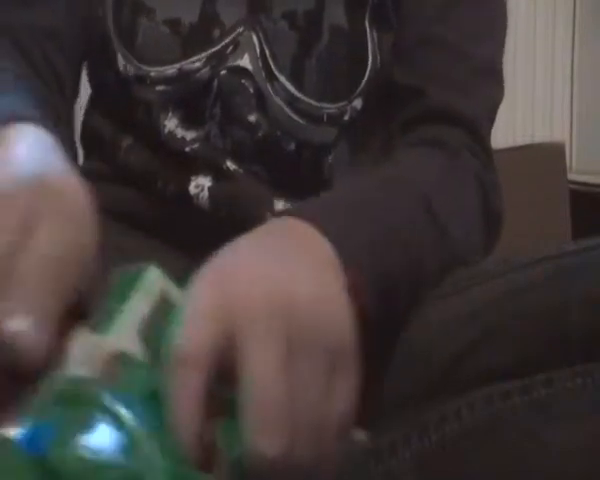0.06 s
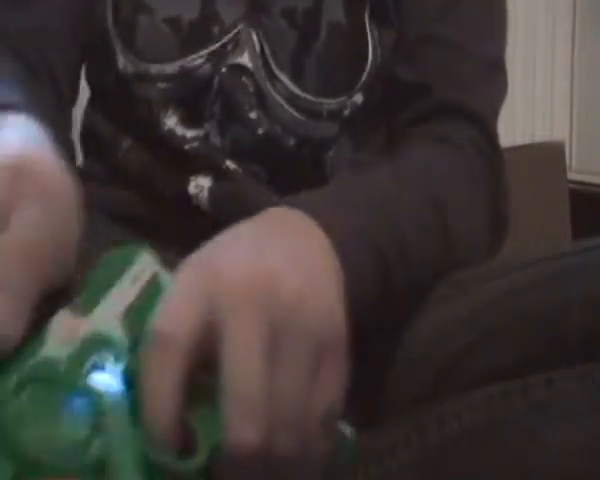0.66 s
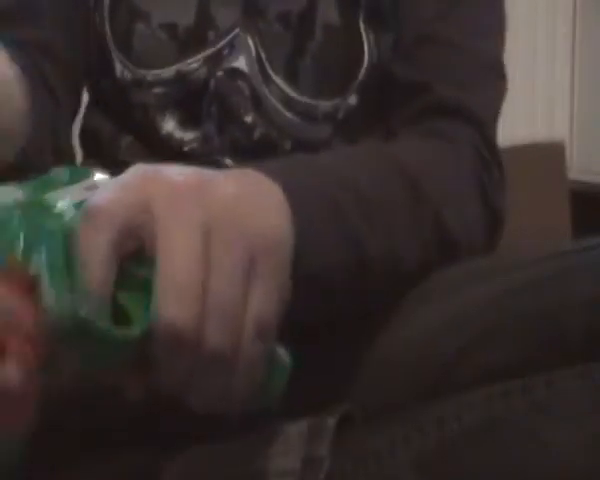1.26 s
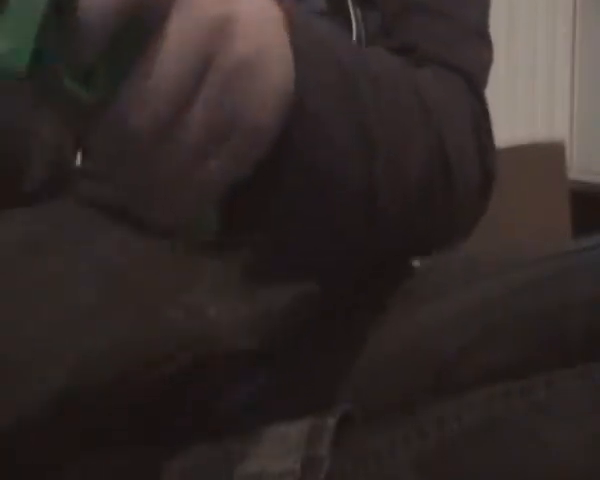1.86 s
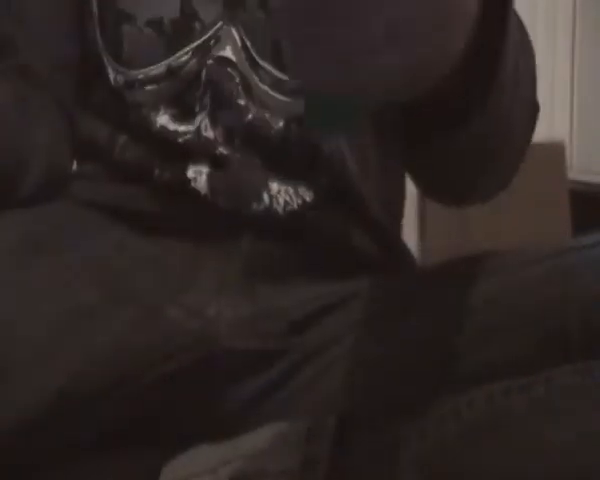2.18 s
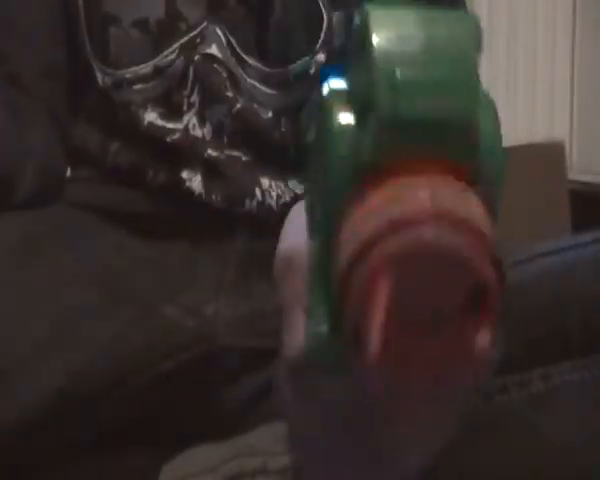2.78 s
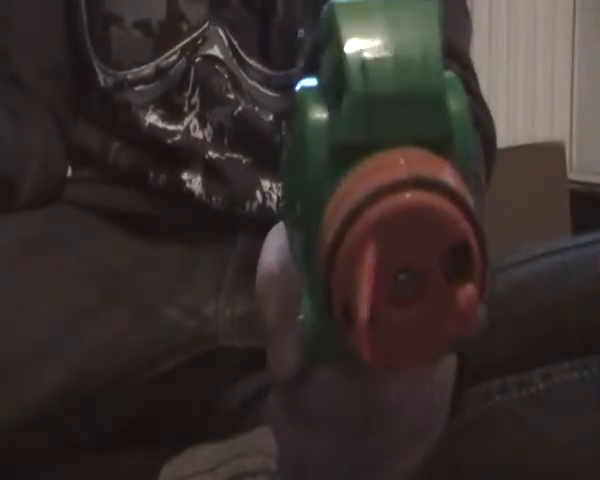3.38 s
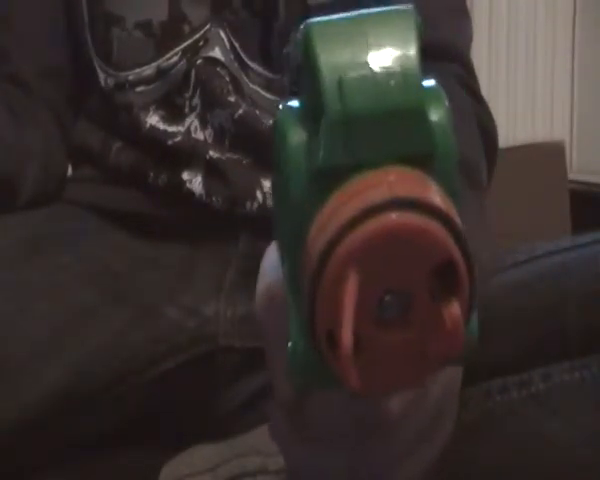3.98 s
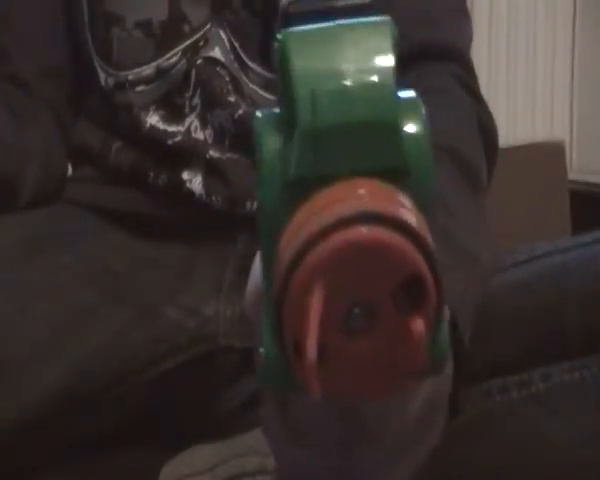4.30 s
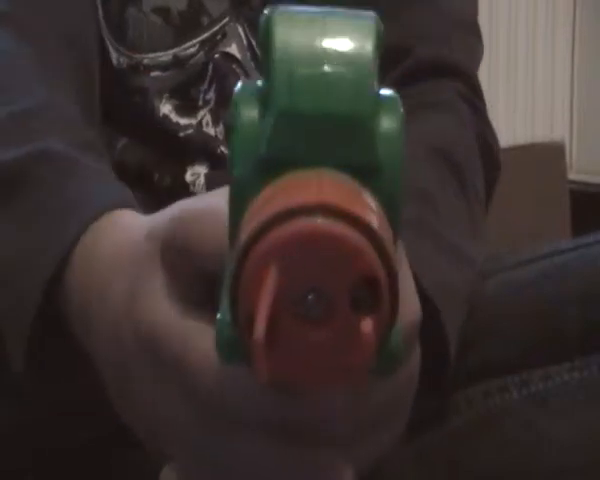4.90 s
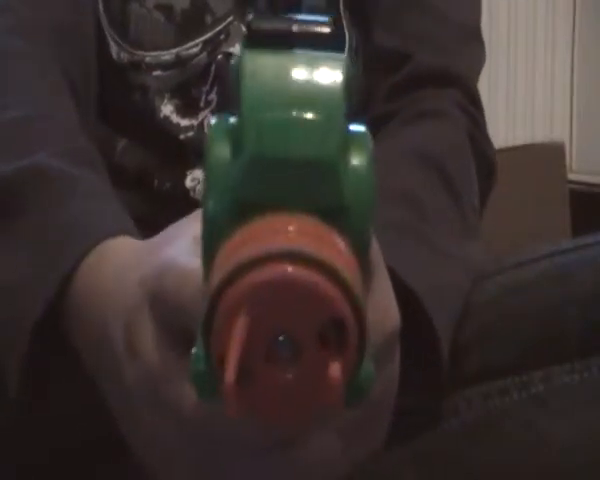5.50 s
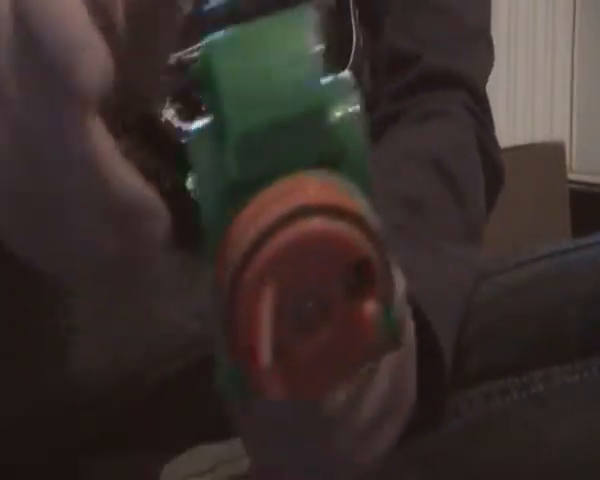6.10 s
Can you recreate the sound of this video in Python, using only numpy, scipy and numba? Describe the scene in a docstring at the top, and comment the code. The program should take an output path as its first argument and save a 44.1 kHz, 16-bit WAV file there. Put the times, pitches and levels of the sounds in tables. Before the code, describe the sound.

Quick runs of loud plastic clicks and rattles from a toy gun's slide, followed by quiet taps and creaks, close up in a small room.

```python
"""Pumping a plastic toy launcher

The toy is pumped three times in a small room, close to a camera, then turned over and gripped. Its slide
scrapes and rattles, a pawl snaps over a ratchet and the slide hits its stop; all excite the modes of the
hollow shell. Later come soft knocks, stick-slip creaks of the seams and the whir of the lens motor as it
refocuses. Cloth rustles over a faint hiss, and a limiter holds the peaks."""
import sys
import numpy as np
from scipy import signal
from scipy.fft import rfft, irfft, next_fast_len
from scipy.io import wavfile
from scipy.ndimage import uniform_filter1d
from numba import njit

SR = 44100
rng = np.random.default_rng(int(sys.argv[2]) if len(sys.argv) > 2 else 0)


def transcribe(signal):
    """Save signal, clipped to [-1, 1], as a 16-bit WAV file at the path in sys.argv[1]."""
    frames = np.atleast_2d(signal).T
    limited = np.clip(frames, -1, 1)
    pcm = np.round(limited * 32767).astype(np.int16)
    wavfile.write(sys.argv[1], SR, pcm)


N = 275625
CLICK_SIZE = 4096  # samples in one impact

# Travels of the slide, plastic on plastic. Each row: start and end in seconds, first and last
# relative level in dB, extra bass of its jiggling in dB.
SLIDE_TRAVELS = [(0.023, 0.095, -21.5, -27, -8), (0.26, 0.296, -29.5, -23, -6),
                 (0.321, 0.404, -25.5, -21.5, 6), (0.639, 0.721, -23.5, -27, -7),
                 (0.862, 0.902, -31.5, -23, -14), (0.943, 1.05, -24, -27, 6.5),
                 (1.247, 1.329, -31, -34, -17), (1.505, 1.541, -27.5, -30, -12.5),
                 (1.562, 1.683, -29.5, -23, 5), (2.204, 2.258, -39, -35, -6),
                 (2.256, 2.37, -27, -47.5, -12), (2.508, 2.541, -47, -40, -3), (4.79, 5.07, -61, -56, 4),
                 (6.055, 6.24, -47.5, -65, 6)]


def end_stop():
    """Impact: the slide is halted at the end of its travel. Returns the clacks and the low jolts."""
    # Each row: start in seconds, relative level in dB, chatter in seconds, extra bass and treble in dB,
    # panel pitch in Hz.
    hits = [(0.0796, -9.5, 0.0024, 3, -4, 2820), (0.3881, -10, 0.0042, -11, 0, 2780),
            (0.705, -9, 0.0022, 2, -4, 3450), (1.0297, -10, 0.0026, 0, 0.5, 2630),
            (1.0335, -11.5, 0.0027, -3.5, 2.5, 3140), (1.33, -10.5, 0.0029, -0.5, -4, 2780),
            (1.6465, -10, 0.0035, -1, 3, 2580)]
    # Spectrum of the contact. Each row: frequency in Hz, gain in dB.
    colour = [(80, -18), (200, -20), (400, -14), (900, -14.5), (1500, -8.5), (2000, -5), (2700, -0.5),
              (3600, -2.5), (4800, -3.5), (6000, -10), (7600, -11.5), (9800, -8.5), (11800, -13),
              (13000, -32)]
    clacks = impacts(hits, colour, gain_db=1.5, ring_db=-18, buzz_db=-17, buzz_s=.006)
    return clacks, thuds(hits, gain_db=-39.5)


def ratchet(treble_db=-.1):
    """Elastic release: a pawl snaps over a few teeth on each pull. Returns the snaps and the low jolts."""
    # Each row: start in seconds, relative level in dB, chatter in seconds, extra bass in dB,
    # panel pitch in Hz.
    teeth = [(0.3483, -17.5, 0.0015, -4, 3620), (0.3511, -8, .0036, -1, 2610),
             (0.3664, -18.5, .002, 2, 4950), (0.3802, -19, .003, -2.5, 2560),
             (0.9705, -14, .0035, -0.5, 2650), (0.9917, -14, .003, -4.5, 2630),
             (1.0117, -13.5, .0025, -4.5, 2500), (1.6031, -13.5, 0.0041, 3, 4970),
             (1.619, -21.5, .0048, -2, 4570), (1.6317, -12, 0.0021, -4, 3140)]
    # Spectrum of a snap. Each row: frequency in Hz, gain in dB.
    colour = [(80, -30.5), (200, -13), (400, -7.5), (900, -15), (1500, -3.5), (2000, -4.5), (2700, -0.5),
              (3600, -2), (4800, 0), (6000, -6.5), (7600, -7), (9800, 4.5), (11800, -4), (13000, -19.5)]
    hits = [(s, db, chatter_s, bass_db, treble_db, hz) for s, db, chatter_s, bass_db, hz in teeth]
    snaps = impacts(hits, colour, gain_db=3, ring_db=-15, buzz_db=-18.5, buzz_s=.005)
    return snaps, thuds(hits, gain_db=-46.5)


def slide_rattle():
    """Backlash: parts with free play collide, as the slide clacks in its guides, jiggles and settles."""
    # Each row: start in seconds, relative level in dB, chatter in seconds, extra bass and treble in dB,
    # panel pitch in Hz.
    clacks = [(0.0421, -15, 0.0043, -10, 6, 4930), (0.052, -18, 0.0059, -11.5, -4.5, 4200),
              (0.2638, -24.5, .0048, -3, -6, 4034), (0.275, -18, .0018, -13, -15, 3510),
              (0.2847, -14.5, 0.0033, 0, -1, 3960), (0.6491, -22.5, .002, -5.5, -0.5, 4350),
              (0.6686, -16.5, .001, -11.5, 6.5, 5100), (0.679, -20, .0044, -8.5, 1, 4804),
              (0.84, -33.5, 0.0016, 1.5, -14, 2990), (0.8931, -18.5, 0.004, 3, -4, 4610),
              (0.935, -29.5, 0.0031, 4.5, -9.5, 2820), (1.2172, -38, 0.0013, 11.5, -3, 2862),
              (1.2518, -27, .0018, -14, -5, 2820), (1.271, -16, .0017, -24, 6.5, 5230),
              (1.2598, -26, .0022, -17, 1, 4393), (1.2895, -22, 0.0055, -9, 2, 5170),
              (1.5081, -24, .004, -16, -0.5, 2780), (1.5334, -17.5, 0.0014, 0.5, 2.5, 4950),
              (1.5814, -25, .0025, 9.5, -8.5, 4650), (1.8634, -39.5, 0.0015, 2.5, -16, 2990),
              (2.2535, -21, .001, -1.5, 5, 4830), (2.2765, -20, .007, -15, 6, 4755),
              (2.3123, -25, .0013, -14, -3, 3600)]
    # Spectrum of a clack. Each row: frequency in Hz, gain in dB.
    colour = [(80, -24), (200, -17), (400, -10), (900, -14.5), (1500, -8.5), (2000, -5), (2700, -0.5),
              (3600, -1.5), (4800, 0), (6000, -3.5), (7600, -6), (9800, -5), (11800, -10.5), (13000, -29.5)]
    hits = clacks + settling_hits() + jiggling_hits()
    return impacts(hits, colour, gain_db=-.5, ring_db=-11, buzz_db=-13, buzz_s=.011)


def jiggling_hits(gap_s=.011, chatter_s=.002, offset_db=-4.5, scatter_db=2):
    """Intermittent contact: the moving slide taps its guides unevenly, the harder the more it scrapes."""
    hits = []
    for start, end, first_db, last_db, bass_db in SLIDE_TRAVELS:
        treble_db = -6 - .45 * bass_db  # the thinner a tap, the brighter
        hz = 4750 * 2 ** (.03 * treble_db)  # a brighter tap comes from a stiffer panel
        for s in np.arange(start + gap_s / 2, end - gap_s, gap_s):
            late, strength = rng.random(2)
            scrape_db = np.interp(s, [start, end], [first_db, last_db])
            db = scrape_db + offset_db + scatter_db * (2 * strength - 1)
            hits.append((s + late * gap_s, db, chatter_s, bass_db, treble_db, hz))
    return hits


def settling_hits(gap_s=.0275, fall_db_per_s=110, chatter_s=.002, bass_db=-1.5, treble_db=-6):
    """Dissipation: loose parts tick on after a stroke with exponentially falling strength."""
    # Each row: start and end in seconds, relative level of the first tick in dB, panel pitch in Hz.
    runs = [(0.124, 0.135, -28.5, 3430), (0.731, 0.8, -25.5, 2680), (1.7237, 1.76, -31, 3000),
            (2.333, 2.48, -35, 4500)]
    hits = []
    for start, end, first_db, hz in runs:
        for age in np.arange(0, end - start, gap_s):
            late, strength = rng.standard_normal(2)
            db = first_db - fall_db_per_s * age + 1.5 * strength
            hits.append((start + age * (1 + .045 * late), db, chatter_s, bass_db, treble_db, hz))
    return hits


def slide_scrape(gain_db=-2, ring_db=-9, slips_per_s=420, spread_db=3.5, slip_s=.001, rub=.3):
    """Stick-slip friction: the slide drives the shell with random micro-impacts over a faint rub."""
    # Spectrum of the friction. Each row: frequency in Hz, gain in dB.
    colour = [(100, -30), (400, -14), (1100, -19.5), (1700, -10), (2500, 3), (4600, 4), (6200, -5),
              (9500, -7), (11800, -14), (13000, -25.5)]
    out, size = np.zeros((2, N)), 4 * CLICK_SIZE
    for start, end, first_db, last_db, _ in SLIDE_TRAVELS:
        span = int(np.clip((end - start) * SR, 100, size - CLICK_SIZE))
        slips = rng.random(size) < slips_per_s / SR
        strengths = undb(spread_db * np.minimum(rng.exponential(size=size), 2))
        friction = signal.lfilter([1], [1, -np.exp(-1 / (slip_s * SR))], slips * strengths) + rub
        force = (friction * rng.standard_normal((2, size)))[:, :span]
        force *= undb(np.linspace(0, last_db - first_db, span)) / rms(force)
        force *= signal.windows.tukey(span, .22)  # the slide gathers speed and slows again
        ring = 1 + undb(ring_db) * rfft(irfft(shell_ring()), size)
        body = minimum_phase(over_hz(colour, size)) * ring
        scrape = irfft(microphone_ports(rfft(force, size) * body / rms(abs(body))))
        add(out, start, undb(first_db + gain_db) * scrape)
    return out


def handling_knocks(rebound_s=.0105, loss_db=3):
    """Inelastic collision: hands and parts knock on the shell; each rebound is softer and duller."""
    # Each row: start in seconds, relative level in dB, chatter in seconds, extra bass and treble in dB,
    # panel pitch in Hz, number of rebounds.
    knocks = [(1.9712, -32, 0.0071, -6.5, -9.5, 2300, 0), (2.2085, -28, .008, -6, -0.5, 3020, 1),
              (2.4964, -42.5, 0.004, 2, -22, 2440, 0), (2.5114, -27.5, 0.0026, -5.5, 0.5, 2600, 2),
              (2.703, -48, 0.0025, -10, 5, 3100, 0), (2.732, -28.5, 0.0024, -6, -2, 2920, 0),
              (2.9415, -52, .006, -6, -9, 3010, 0), (2.9787, -48.5, .0024, -8, -1, 4260, 0),
              (3.2634, -51, 0.0018, 2.5, -14, 2220, 0), (3.607, -36.5, 0.0039, -12.5, -8, 2674, 0),
              (3.963, -39, 0.0036, -5.5, -1, 2740, 0), (4.8525, -37.5, .004, -12, -2, 3150, 0),
              (4.8574, -30.5, 0.0033, -11, 1.5, 3470, 0), (4.9406, -33, 0.0054, -5, 9, 2220, 0),
              (5.021, -45.5, 0.0055, 2.5, 5, 2500, 0), (6.0736, -40.5, .0045, 0, -4, 2250, 1),
              (6.1209, -39.5, .004, -2.5, 6, 2220, 0), (6.131, -34.5, 0.0033, -7.5, -4, 2500, 0),
              (6.1686, -38.5, .0025, -9.5, -9, 2470, 0), (6.217, -45, .002, -9, 0, 2620, 0)]
    # Spectrum of a knock. Each row: frequency in Hz, gain in dB.
    colour = [(80, -20.5), (200, -9), (400, 1.5), (900, -3), (1500, -5), (2000, -3), (2700, -2.5),
              (3600, -5), (4800, -7.5), (6000, -12.5), (7600, -17), (9800, -17.5), (11800, -21),
              (13000, -41)]
    hits = [(s + k * rebound_s, db - k * loss_db, chatter_s, bass_db, treble_db - k * loss_db, hz)
            for s, db, chatter_s, bass_db, treble_db, hz, rebounds in knocks
            for k in range(rebounds + 1)]
    return impacts(hits, colour, gain_db=.56, ring_db=-12, buzz_db=-4.5, buzz_s=.0076)


def seam_creaks(chatter_s=.0026, pitch_scatter=.12):
    """Stick-slip motion: seams yield in runs of dry clicks, faster or slower as the grip changes."""
    # Each row: first and last slip in seconds, number of slips, ratio of each gap to the one before,
    # first and last relative level in dB, tilt from bass to treble in dB, panel pitch in Hz.
    runs = [(3.7005, 3.7435, 4, 1.2, -56.5, -56, 2, 3450), (3.8035, 3.9387, 8, 0.87, -54.5, -50.5, 1, 3730),
            (4.024, 4.0615, 2, 1, -54, -50.5, 1.5, 3810), (4.4465, 4.4837, 2, 1, -55.5, -57, -2, 2400),
            (4.509, 4.6415, 6, 1.17, -49, -48.5, -3, 3040), (4.7143, 4.7143, 1, 1, -49.5, -49.5, -8, 2330),
            (5.1097, 5.1656, 4, .85, -49.5, -48.5, -6.5, 2970), (5.649, 5.649, 1, 1, -36, -36, 8.5, 5300),
            (5.7734, 5.8883, 2, 1, -52.5, -58.5, -5, 2340)]
    # Spectrum of a slip. Each row: frequency in Hz, gain in dB.
    colour = [(80, -27), (200, -24), (400, -5.5), (900, -5.5), (1500, -11), (2000, 3.5), (2700, -2),
              (3600, 3), (4800, -0.5), (6000, -7), (7600, -8), (9800, -2.5), (11800, -4), (13000, -39)]
    hits = []
    for start, end, slips, gap_ratio, first_db, last_db, tilt_db, hz in runs:
        steps = np.cumsum(float(gap_ratio) ** np.arange(slips))
        times = np.interp(steps, steps[[0, -1]], [start, end])
        levels = np.linspace(first_db, last_db, slips)
        pitches = hz * np.exp(pitch_scatter * rng.standard_normal(slips))
        hits += [(s, db, chatter_s, -tilt_db, tilt_db, pitch)
                 for s, db, pitch in zip(times, levels, pitches)]
    return impacts(hits, colour, gain_db=1, ring_db=-14, buzz_db=-16, buzz_s=.004)


def impacts(hits, colour, gain_db, ring_db, buzz_db, buzz_s, panel_width_hz=260, attack_s=.00093):
    """Source and filter: parts chatter and loose seams buzz, exciting the struck panel and the shell."""
    out, t = np.zeros((2, N)), np.arange(CLICK_SIZE) / SR
    bins_hz = np.fft.rfftfreq(CLICK_SIZE, 1 / SR)
    bass_shelf = over_hz([(1000, 1), (2000, 0)], CLICK_SIZE)
    treble_shelf = over_hz([(4500, .0044), (8500, 1)], CLICK_SIZE)
    attack, fade = 1 - np.exp(-t / attack_s), np.linspace(1, 0, CLICK_SIZE)
    for s, db, chatter_s, bass_db, treble_db, panel_hz in hits:
        contact = np.exp(-(t / chatter_s) ** 2) + undb(buzz_db) * np.exp(-t / buzz_s)
        force = rfft(rng.standard_normal((2, CLICK_SIZE)) * contact * attack)
        force /= np.sqrt(uniform_filter1d(abs(force) ** 2, size=90))  # hard contact feeds all bands
        shelves_db = bass_db * bass_shelf + treble_db * treble_shelf
        panel_db = 6 / (1 + ((bins_hz - panel_hz) / panel_width_hz) ** 2)
        body = minimum_phase(over_hz(colour, CLICK_SIZE) + shelves_db + panel_db)
        body *= 1 + undb(ring_db) * shell_ring()
        click = irfft(microphone_ports(force * body)) * fade
        onset_energy = np.mean(np.sum(click[:, :330] ** 2, axis=1))
        onset_rms = np.sqrt(onset_energy / (.005 * SR))  # that energy spread over 5 ms
        add(out, s, undb(db + gain_db) * click / onset_rms)
    return out


def shell_ring(scatter_db=3, detune=.008):
    """Modal superposition: the spectrum of the shell's damped modes, weighted anew at each contact."""
    # Each row: frequency in Hz, relative level in dB, time to decay by 60 dB in seconds.
    modes = [(312, -13, .07), (530, -13, .05), (1040, -10.5, .04), (1400, -12.5, .04), (1897, -1.5, .05),
             (2310, -2.5, 0.15), (2480, -2.5, 0.13), (2758, -2, 0.023), (3097, -5, 0.054),
             (3530, -4.5, 0.062), (4077, -3, .04), (4714, -7.5, .04), (4880, -2.5, .04), (5114, -6.5, .035)]
    hz, db, t60 = np.transpose(modes)[:, :, None]
    weight, shift, phase = rng.standard_normal((3, len(modes), 1))
    t = np.arange(CLICK_SIZE) / SR
    envelopes = undb(db + scatter_db * weight - 60 * t / t60)
    tones = np.sin(2 * np.pi * (hz * (1 + detune * shift) * t + phase))
    return rfft((envelopes * tones).sum(axis=0)) / np.sqrt(SR)


def thuds(hits, gain_db, decay_s=.0042, attack_s=.0004):
    """Recoil: a heavy blow jolts the whole toy in the hands, giving a short, low thud."""
    out, t = np.zeros((2, N)), np.arange(CLICK_SIZE) / SR
    envelope = np.exp(-t / decay_s) * (1 - np.exp(-t / attack_s))
    colour = [(25, 0), (90, -2.5), (250, -2.5), (500, -15.5), (1500, -43.5)]
    for s, _, _, bass_db, _, _ in hits:
        jolt = tint(stereo_noise(CLICK_SIZE, width=.3), colour)
        add(out, s, undb(gain_db + bass_db / 2) * jolt * envelope)
    return out


def rustles(gain_db=-3):
    """Friction noise: sleeves and palms brush the toy in soft, low swells."""
    # Each row: midpoint and length in seconds, relative level in dB, centre frequency in Hz.
    swells = [(0.222, 0.075, -45.5, 438), (0.327, 0.22, -58, 200), (0.598, 0.12, -56.5, 208),
              (.6, 0.38, -57, 60), (3.298, 0.86, -64, 89.5), (3.699, 0.51, -64.5, 128),
              (4.388, 0.065, -57.5, 193), (5.027, 0.049, -48.5, 406), (5.091, 0.1, -58.5, 159),
              (6.109, 0.13, -60, 355)]
    out = np.zeros((2, N))
    for s, length, db, hz in swells:
        size = int(length * SR)
        colour = [(hz / 5, -18), (hz * .75, -2), (hz * 1.5, 0), (hz * 2.1, -16), (hz * 16, -50)]
        brush = tint(stereo_noise(size, width=.24), colour)
        add(out, s - length / 2, undb(db + gain_db) * brush * np.hanning(size))
    return out


def focus_motor(db=-60, step_hz=125, run_s=.061, rest_s=.012):
    """Amplitude modulation: the lens motor moves in short runs, each step a puff of fine hiss."""
    # Hunts for focus. Each row: start and end in seconds.
    hunts = [(2.998, 3.137), (3.16, 3.522), (3.585, 3.9)]
    # Spectrum of the motor. Each row: frequency in Hz, gain in dB.
    colour = [(1000, -10.5), (4800, -9.5), (6200, 1), (8300, 3), (10000, -4), (12000, -9), (13000, -13)]
    t = np.arange(N) / SR
    runs = sum(1. * ((t > start) & (t < end) & ((t - start) % (run_s + rest_s) < run_s))
               for start, end in hunts)
    running = uniform_filter1d(runs, size=150)
    phase = 2 * np.pi * step_hz * t
    steps = 1 + .29 * np.cos(phase) + .13 * np.cos(3 * phase)
    return undb(db) * running * steps * tint(stereo_noise(N, width=.59), colour)


def noise_floor(air_db=-60.93):
    """Stationary noise: room air, hiss and electronic whine; rumble is more coherent than hiss."""
    # Spectrum of the still room and the hiss. Each row: frequency in Hz, relative density in dB.
    colour = [(15, -32), (25, -4), (79, -10.5), (117, -2.5), (140, -10.5), (202, -7.5), (230, -12),
              (306, -8.5), (368, -13), (453, -11.5), (573, -14), (1430, -19), (3470, -20.5), (10400, -23.5),
              (12800, -35), (16600, -66), (22000, -120)]
    # Tones of the electronics. Each row: frequency in Hz, level in dB.
    tones = [(7800, -78), (7827, -82), (10584, -80)]
    t = np.arange(N) / SR
    whine = sum(undb(db) * np.sin(2 * np.pi * hz * t) for hz, db in tones)
    mid, side = rfft(rng.standard_normal((2, N)))
    side *= undb(over_hz([(100, -5), (400, -3.5), (2000, 0), (10000, -2)], N))
    air = tint(irfft(np.array([mid + side, mid - side]), N), colour)
    return undb(air_db) * air + whine


def room(x, wet_db=-7, build_s=.004):
    """Reverberation: wall reflections build up in a few ms and die away, the treble first."""
    # Each row: frequency in Hz, reverberation time in seconds.
    decays = [(200, .54), (530, .48), (1400, .4), (2600, .39), (4500, .37), (10000, .32), (12500, .27)]
    # Spectrum of the reflections. Each row: frequency in Hz, gain in dB.
    colour = [(80, -10.5), (300, 0.5), (800, 4), (2300, 3), (4000, -3.5), (7000, 4.5), (10000, -3.5),
              (11800, -0.5), (13000, -9.5)]
    size = 2 ** 15
    t = np.arange(size) / SR
    centres, t60s = np.transpose(decays)
    noise, tail = rfft(stereo_noise(size, width=.55)), 0
    for share, t60 in zip(np.eye(len(centres)), t60s):
        band = irfft(noise * over_hz(np.c_[centres, share], size))
        tail = tail + band * undb(-60 * t / t60)
    build_up = 1 - np.exp(-(t / build_s) ** 2)
    tail = tint(tail * build_up, colour) / np.sqrt(size)
    return undb(wet_db) * signal.fftconvolve(x, tail, axes=1)[:, :N]


def microphone_ports(pair):
    """Partial coherence: a common and an unrelated spectrum reach two ports unlike in level and phase."""
    # Each row: frequency in Hz, left minus right in dB, phase lead of left in radians, unrelated share.
    response = [(100, 2, 0, .1), (1000, 1.5, .15, .06), (3000, .5, .2, .06), (4500, -1.5, .4, .17),
                (5700, -5, .8, .35), (7200, -2, 2.4, .45), (8300, 3, 2, .45), (9500, 9, .9, .35),
                (10500, 6, .8, .4), (11400, -1, 1.1, .55), (13000, 1, 1, .65)]
    common, unrelated = pair
    size = 2 * (len(common) - 1)
    pan_db, lead, share = (over_hz(response, size, column) for column in (1, 2, 3))
    sign = np.array([[1], [-1]])
    gain = undb(sign * pan_db / 2)
    gain = gain / np.sqrt(np.mean(gain ** 2, axis=0)) * np.exp(.5j * sign * lead)
    return gain * (np.sqrt(1 - share / 2) * common + sign * np.sqrt(share / 2) * unrelated)


def undb(db):
    """Amplitude ratio of a level in decibels."""
    return 10 ** (np.asarray(db) / 20)


def rms(x):
    """Root mean square amplitude."""
    return np.sqrt(np.mean(x ** 2) + 1e-20)


def over_hz(table, size, column=1):
    """Interpolation in log frequency of one table column onto the bins of a transform."""
    table = np.array(table, float)
    return np.interp(np.log(np.fft.rfftfreq(size, 1 / SR) + 1), np.log(table[:, 0]), table[:, column])


def minimum_phase(db):
    """Causality: a response with the given gain that rings only after the blow."""
    cepstrum = irfft(np.log(undb(db)))
    half = len(cepstrum) // 2
    cepstrum[1:half] *= 2
    cepstrum[half + 1:] = 0
    return np.exp(rfft(cepstrum))


def tint(x, colour):
    """Spectral shaping by rows of frequency in Hz and gain in dB; the result has unit rms."""
    size = next_fast_len(x.shape[-1], real=True)
    y = irfft(rfft(x, size) * undb(over_hz(colour, size)), size)[..., :x.shape[-1]]
    return y / rms(y)


def add(out, s, sound):
    """Superposition: a sound joins the mix at s seconds."""
    start = max(int(s * SR), 0)
    part = sound[..., :max(N - start, 0)]
    out[..., start:start + part.shape[-1]] += part


def stereo_noise(size, width):
    """Mid and side noise: left and right are fully coherent at width 0."""
    mid, side = rng.standard_normal((2, size))
    return np.array([mid + width * side, mid - width * side]) / np.sqrt(1 + width ** 2)


@njit
def peak_envelope(x, release):
    """Peak detection: the envelope rises at once and decays exponentially."""
    envelope, peak = np.empty(len(x)), 0.
    for i in range(len(x)):
        peak = max(x[i], peak * release)
        envelope[i] = peak
    return envelope


def scene():
    """Direct and reverberant fields: the working parts and the handling add up in one room."""
    stops, stop_jolts = end_stop()
    pawls, pawl_jolts = ratchet()
    rattles, scrape = slide_rattle(), slide_scrape()
    knocks, creaks = handling_knocks(), seam_creaks()
    direct = stops + stop_jolts + pawls + pawl_jolts + rattles + scrape + knocks + creaks
    # three separate echoes, each sound sent at its own level, keep the tail from ringing on one pitch
    echo = room(undb(-9.5) * stops + undb(-6.5) * creaks)
    echo += room(undb(-2) * pawls + undb(-8) * knocks)
    echo += room(undb(-5) * scrape + undb(-6.5) * rattles)
    return direct + echo + rustles() + focus_motor() + noise_floor()


def record(dry, threshold=1.1, release_s=.03, cutoff_hz=12958):
    """Peak limiting: the gain ducks at the loudest blows, the excess is clipped and the top is cut."""
    peak = peak_envelope(np.abs(dry).max(axis=0), np.exp(-1 / (release_s * SR)))
    gain = uniform_filter1d(np.minimum(1, threshold / (peak + 1e-9)), size=24)
    held = np.clip(dry * gain, -.95, .95)
    return signal.sosfilt(signal.ellip(8, .2, 70, cutoff_hz, fs=SR, output="sos"), held)


dry = scene()
out = record(dry)
transcribe(out)
```